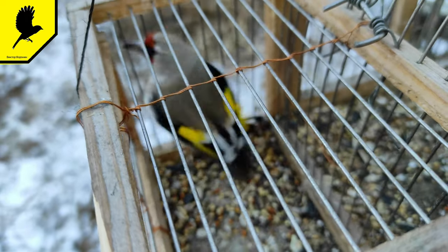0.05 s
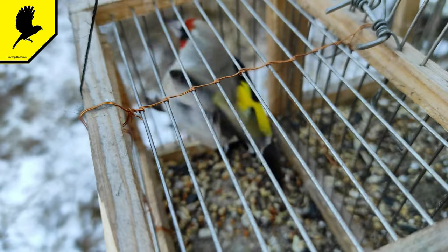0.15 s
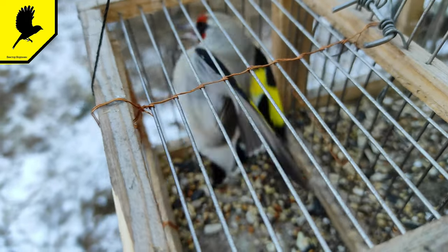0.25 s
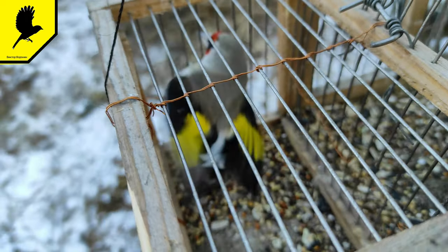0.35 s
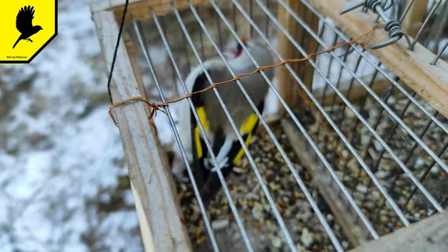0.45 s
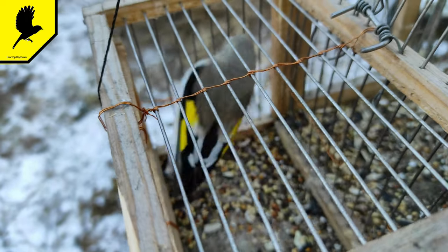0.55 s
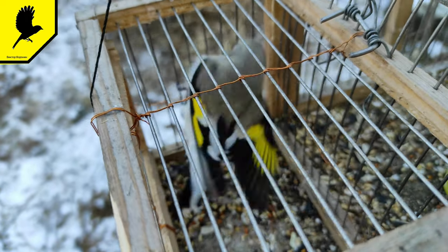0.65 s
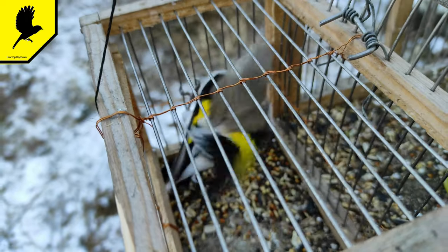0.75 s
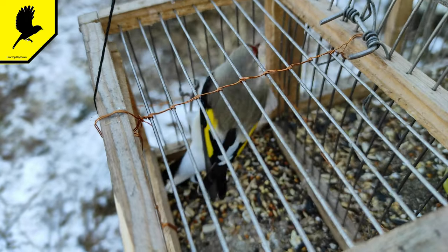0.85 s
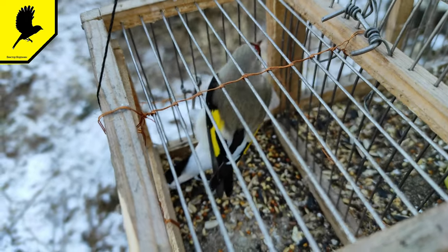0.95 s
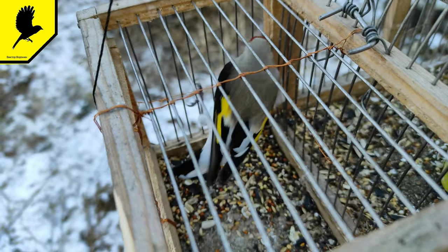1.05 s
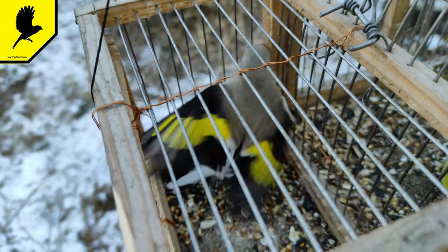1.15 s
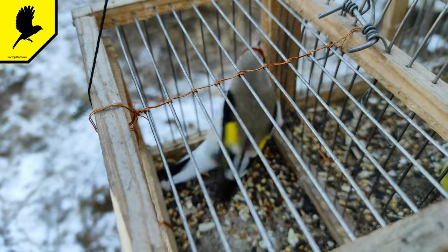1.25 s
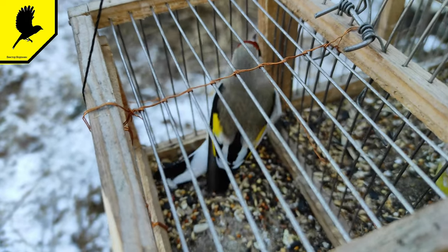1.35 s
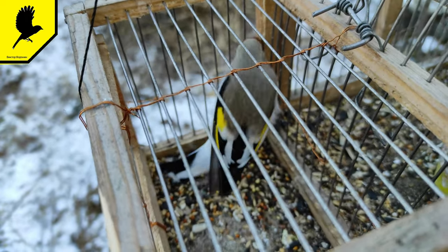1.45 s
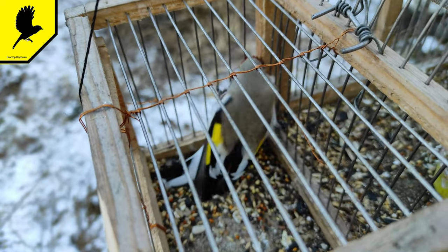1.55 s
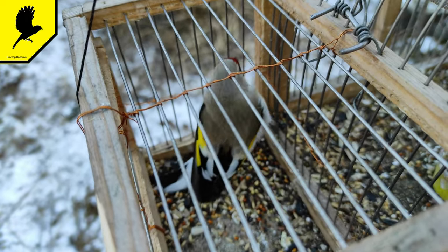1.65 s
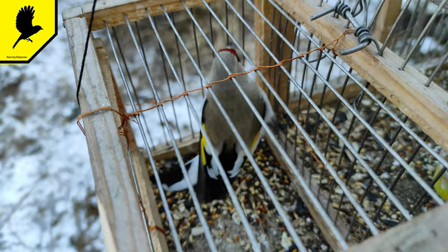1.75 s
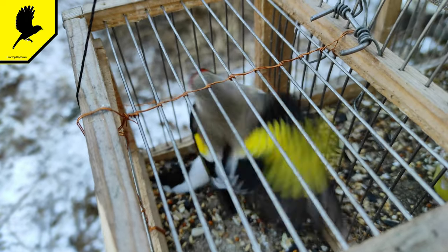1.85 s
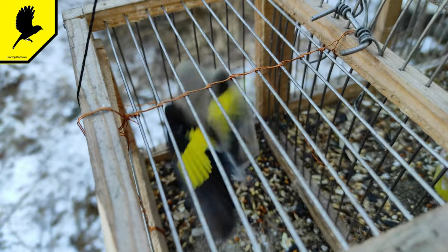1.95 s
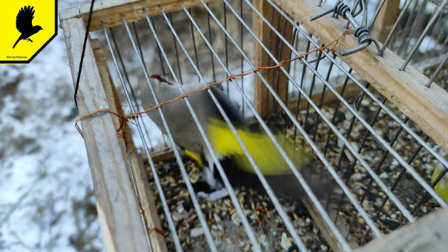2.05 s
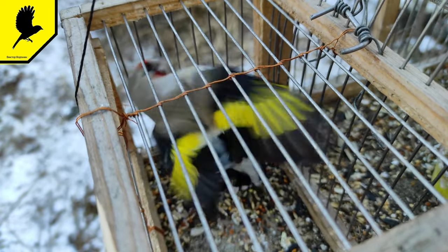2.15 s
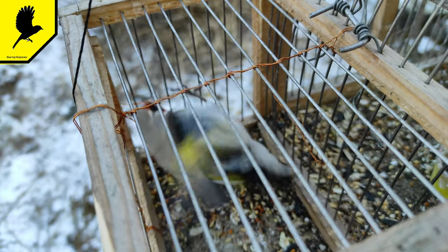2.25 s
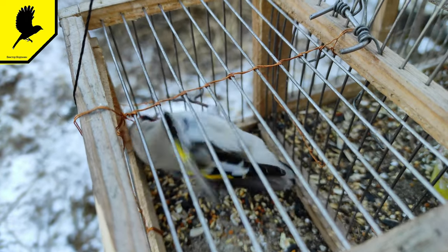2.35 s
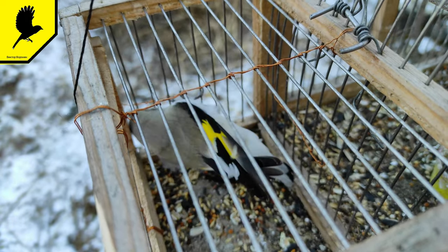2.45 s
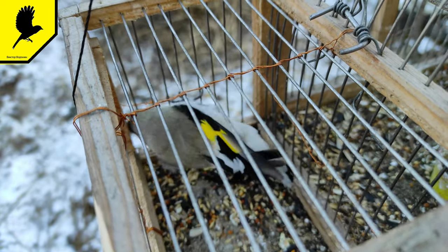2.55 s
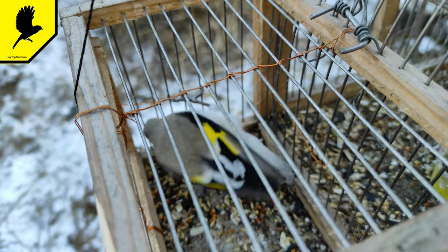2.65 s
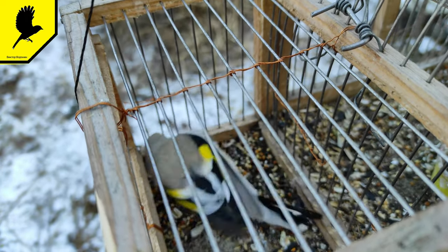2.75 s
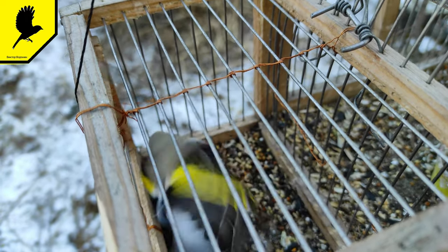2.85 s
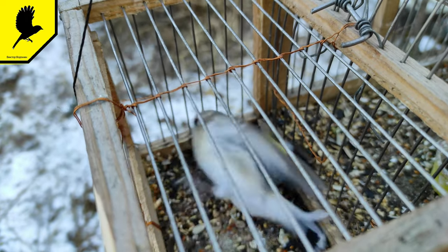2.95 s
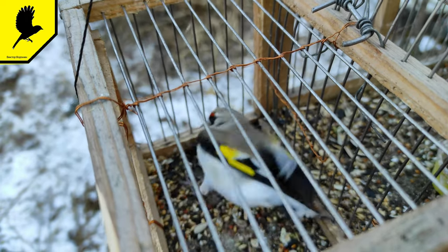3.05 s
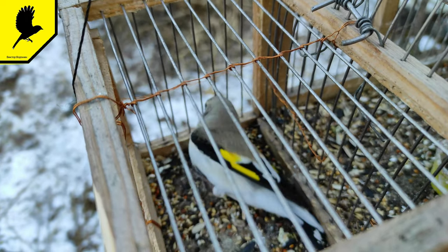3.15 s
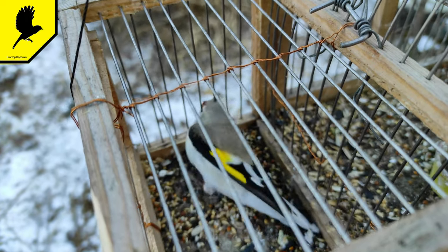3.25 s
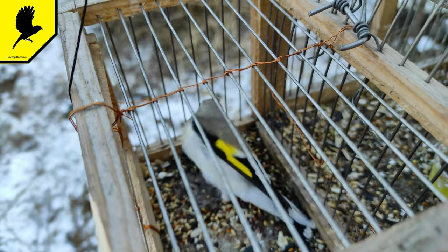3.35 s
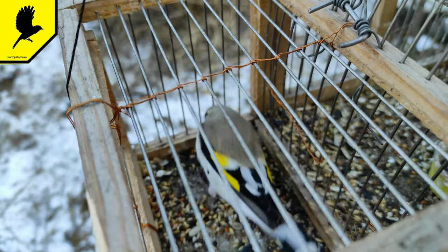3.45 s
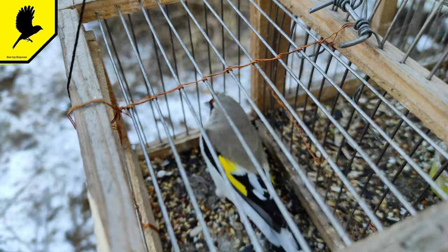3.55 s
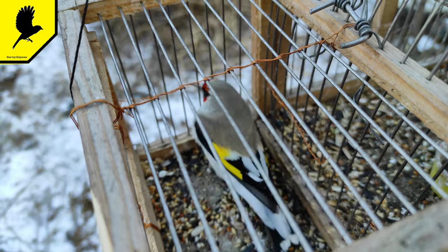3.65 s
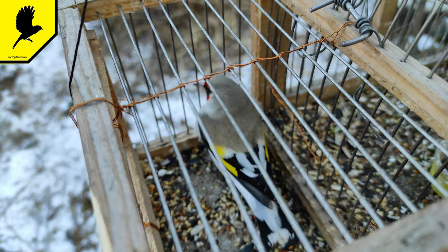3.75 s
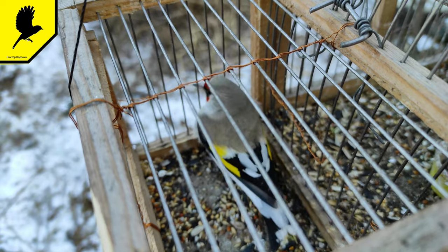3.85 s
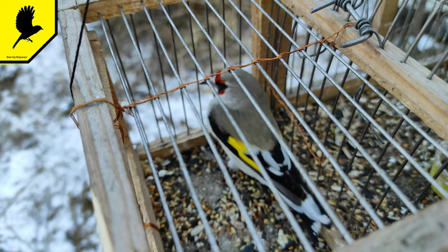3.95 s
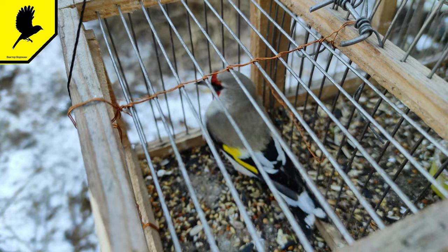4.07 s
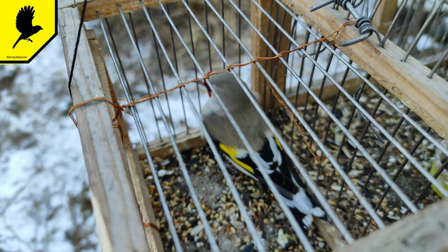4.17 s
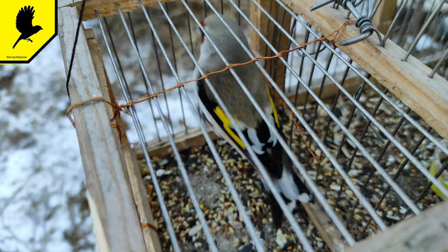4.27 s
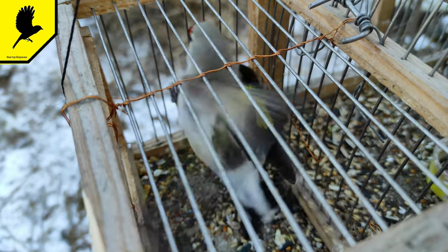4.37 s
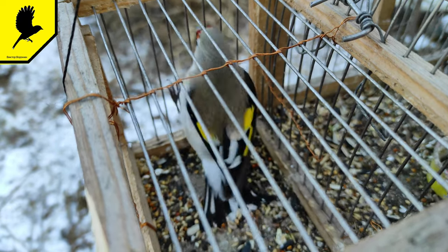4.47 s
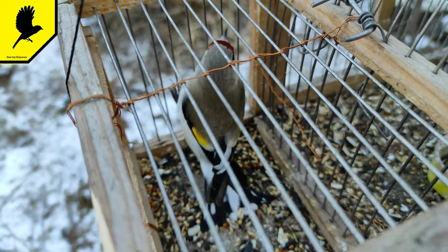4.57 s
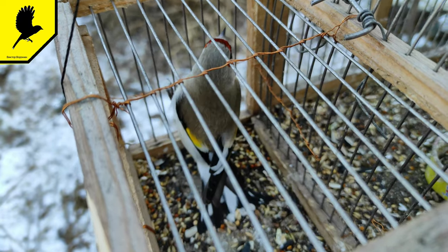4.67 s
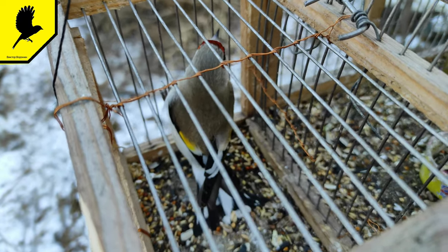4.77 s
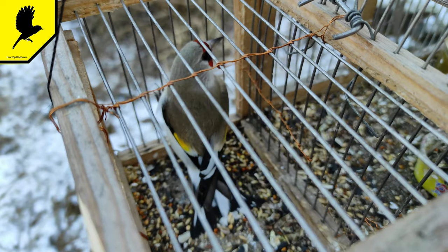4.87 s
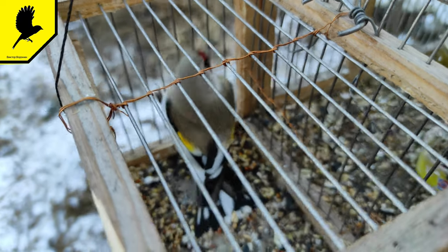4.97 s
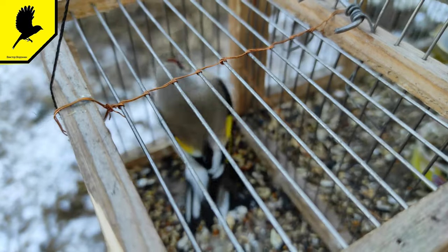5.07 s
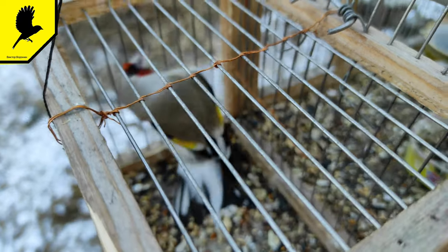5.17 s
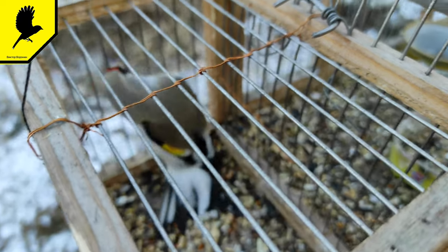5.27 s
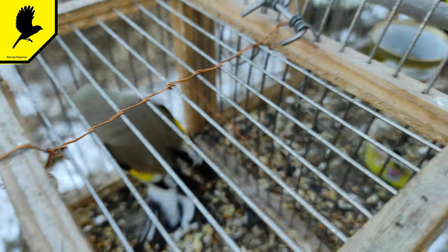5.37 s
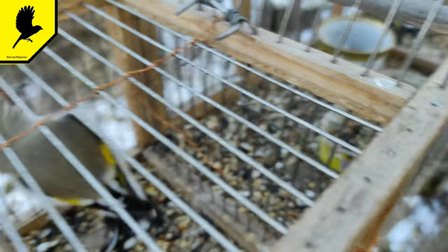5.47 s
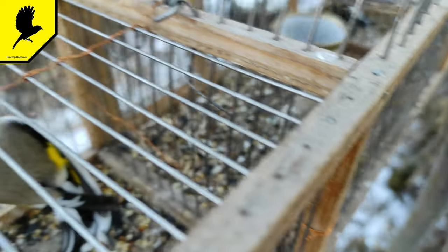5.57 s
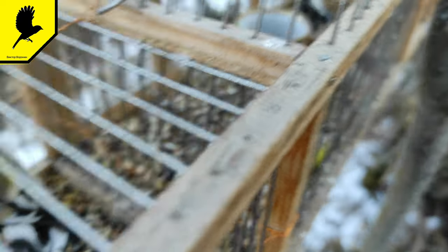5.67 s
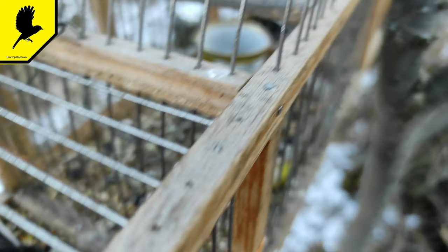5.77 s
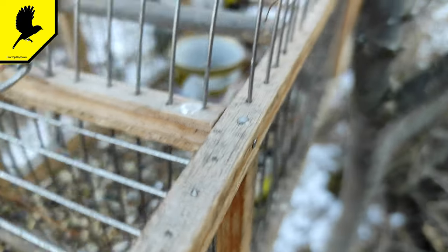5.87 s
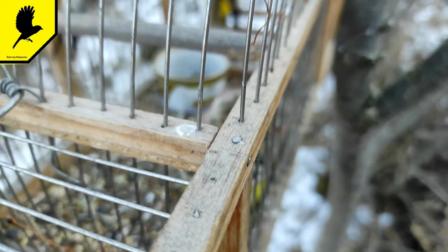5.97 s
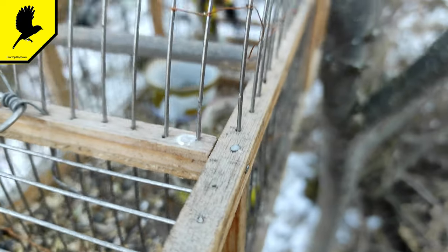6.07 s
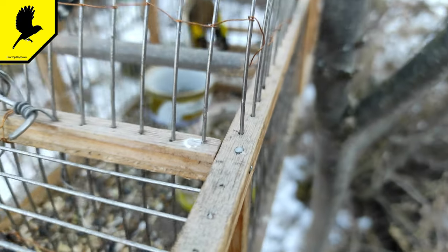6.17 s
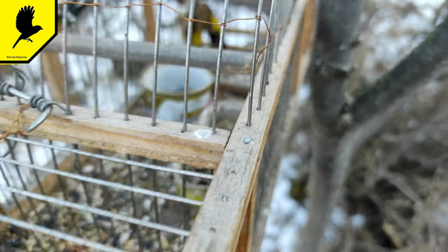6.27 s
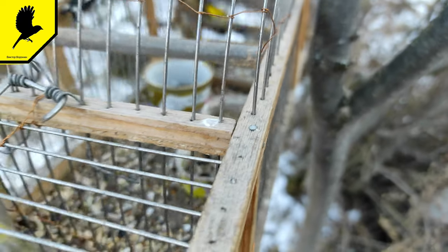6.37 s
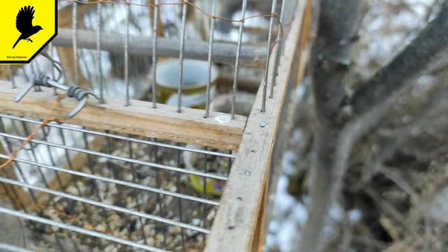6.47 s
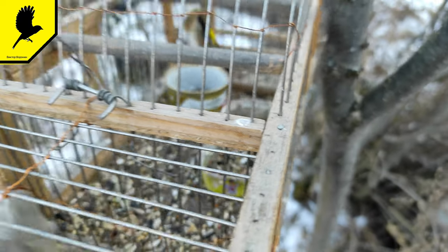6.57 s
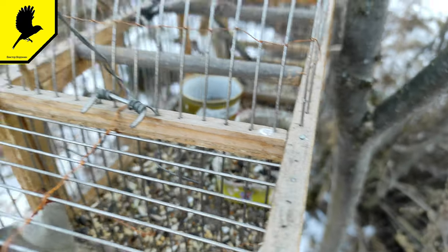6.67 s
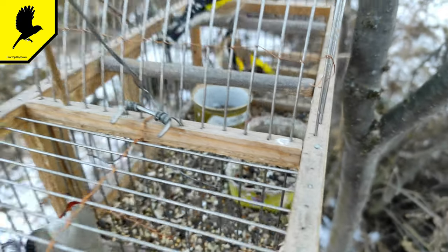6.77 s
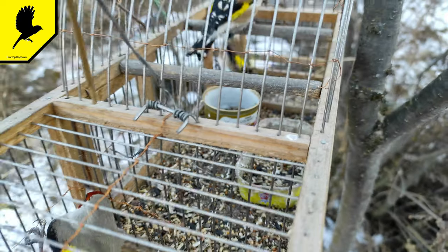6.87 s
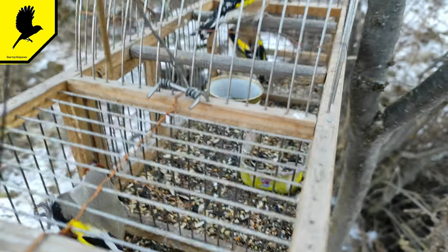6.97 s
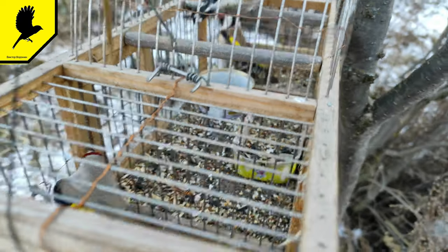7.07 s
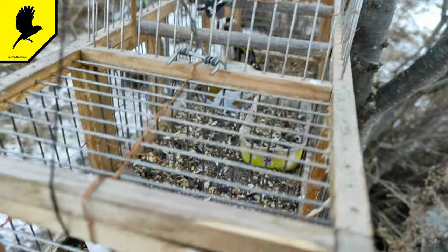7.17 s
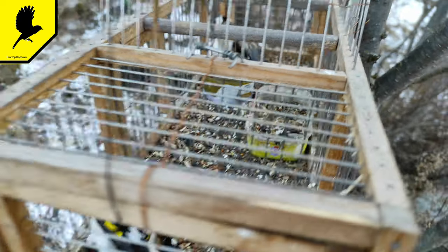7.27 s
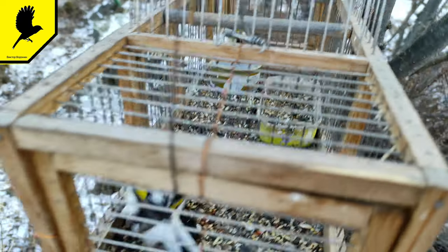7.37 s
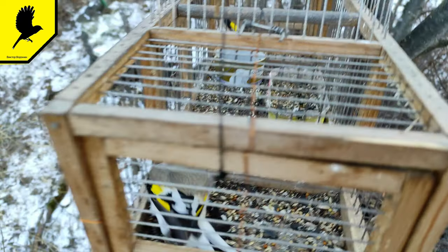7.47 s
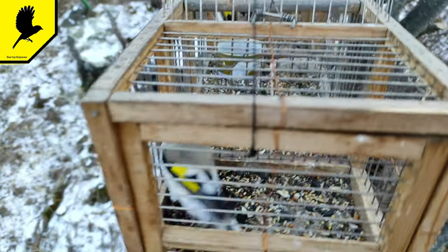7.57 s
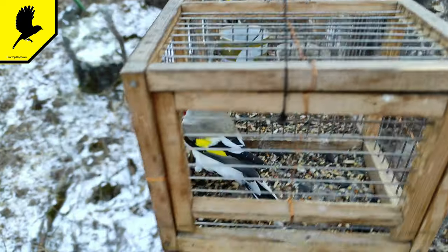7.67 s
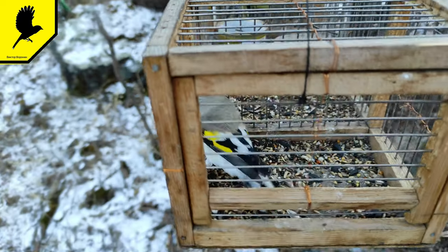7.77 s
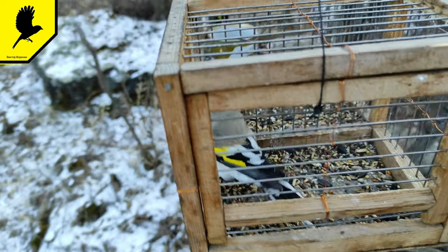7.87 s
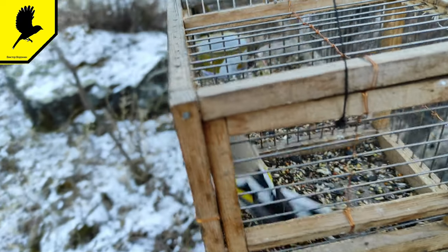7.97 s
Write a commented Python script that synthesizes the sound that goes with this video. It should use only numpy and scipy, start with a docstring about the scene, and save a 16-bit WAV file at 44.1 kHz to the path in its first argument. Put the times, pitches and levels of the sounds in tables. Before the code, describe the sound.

A small bird beats about in a wood-and-wire cage, close up: sharp dry ticks, feathery flutter bursts, scattered seed and woody knocks over faint outdoor hush.

```python
"""Small bird in a wire cage, close

Outdoors, a handheld two-port microphone close to a wood-framed wire cage; a small bird beats about inside.
Feathers and claws tick on bars and scatter seed: clusters of tiny clicks that also ring frame and wires.
Woody taps are decaying noise through resonances that thud and ring one bar.
Wing draughts and a light wind are low filtered noise on the ports; a faint shaped-noise hush lies below.
"""
import sys
import numpy as np
from scipy import signal
from scipy.fft import rfft, irfft
from scipy.io import wavfile

SR = 44100
rng = np.random.default_rng(int(sys.argv[2]) if len(sys.argv) > 2 else 0)


def transcribe(signal):
    """Save signal, clipped to [-1, 1], as a 16-bit WAV file at the path in sys.argv[1]."""
    frames = np.atleast_2d(signal).T
    limited = np.clip(frames, -1, 1)
    pcm = np.round(limited * 32767).astype(np.int16)
    wavfile.write(sys.argv[1], SR, pcm)


N = 353549

# Levels are set at the source: port shading and resonance act on all later, the path only on bird and cage.
# Spectrum of the distant outdoor hush: [f/Hz, relative density/dB]
HUSH_SPECTRUM = [(60, -11), (200, 14), (820, 8), (1500, -2), (4000, -13), (16000, -88)]
# Wind on the ports, before its lumps: [t/s, level/dB]
WIND_LEVEL = [(0.0, -50), (1.15, -61), (2.2, -47), (2.45, -58), (3.8, -60), (4.1, -70), (4.45, -47),
              (5.0, -62.5), (5.75, -58), (5.95, -69), (7.1, -72), (8.0, -66)]
# Wing draughts that thump on the ports: [t/s, swell peak level/dB]
DRAUGHTS = [(0.167, -46.5), (0.256, -43.5), (0.421, -41.5), (0.471, -40.5), (2.864, -45.5), (2.921, -41.5),
            (4.437, -45), (5.462, -45.5), (6.051, -46.5), (6.466, -48), (7.128, -50)]
# Taps that set one bar or slat ringing: [t/s, thud peak level/dB, pitch f/Hz]
BAR_KNOCKS = [(.421, -27, 1100), (1.388, -28.5, 2400), (1.411, -30.5, 970), (3.523, -37.5, 1270),
              (4.053, -44.5, 926), (5.474, -26, 1130), (5.521, -31.5, 1830), (5.581, -35.5, 2000),
              (5.584, -27.5, 980), (5.743, -39.5, 2020), (5.806, -38, 2370), (5.823, -39, 860),
              (5.861, -43, 2130), (6.12, -27.5, 2030), (6.471, -30.5, 1000), (6.527, -31, 910),
              (6.569, -37, 1010), (6.717, -36, 1020), (7.709, -44, 1480)]
# Faint stirring of feathers and seed between bouts: [t/s, tick level/dB]
STIRRING = [(0, -55.5), (.6, -58), (1.0, -66), (1.55, -56.5), (1.75, -68), (2.0, -53), (3.2, -61.5),
            (3.4, -65.5), (4.1, -75.5), (4.5, -70), (4.95, -72.5), (5.3, -60), (6.27, -62.5), (6.7, -54.5),
            (7.05, -60), (8.0, -59)]
# Bouts of fluttering and scrabbling: [start of hold t/s, hold/s, tick level/dB]
FLUTTER_BOUTS = [(.39, 0.03, -47.5), (0.686, 0.17, -52), (1.173, 0.21, -56), (2.3, 0.12, -47),
                 (2.573, 0.085, -49.5), (2.773, 0.26, -50), (3.125, 0.03, -46.5), (3.443, 0.18, -63.5),
                 (4.241, 0.074, -53.5), (4.37, 0.037, -50.5), (5.475, 0.18, -52.5), (6.033, 0.15, -57.5),
                 (6.38, 0.29, -55.5), (7.132, 0.015, -54), (7.283, 0.023, -54.5), (7.81, 0.044, -56.5)]
# Single blows of wing, claw and bill, strong and faint:
# [t/s, snap level/dB, cage drive relative to snap/dB, length/s]
SINGLE_BLOWS = [(0.019, -18, -5, 0.044), (0.1707, -17, -6, 0.027), (0.1846, -20, 4.5, 0.0076),
                (0.2244, -22.5, -6, 0.0061), (0.2543, -28.5, 8, 0.038), (0.306, -29.5, 4.5, 0.055),
                (0.3343, -24, -0.5, 0.015), (0.43, -21, -1, 0.019), (0.472, -16.5, 0.5, 0.028),
                (0.5914, -24.5, 0, 0.038), (0.821, -25, 6.5, 0.05), (1.022, -34, -0.5, 0.11),
                (1.229, -19.5, -4.5, 0.017), (1.2905, -28.5, -3.5, 0.083), (1.3354, -36.5, 11.5, 0.1),
                (1.372, -30, 9, 0.0082), (1.444, -18.5, 1.5, 0.04), (1.462, -23.5, 4.5, 0.029),
                (1.5715, -28.5, -18, 0.031), (1.7635, -32.5, -19, 0.016), (1.9412, -23, -1.5, 0.039),
                (2.002, -15.5, -3, 0.0046), (2.0437, -24, 5.5, 0.087), (2.0863, -23, 2.5, 0.03),
                (2.142, -25.5, -1, 0.075), (2.188, -24.5, 4.5, 0.067), (2.234, -26, 6, 0.064),
                (2.327, -18, -30, 0.078), (2.405, -18.5, -33, 0.08), (2.568, -19.5, -31, 0.03),
                (2.719, -23, -3, 0.02), (2.7683, -16.5, -3.5, 0.011), (2.8613, -29, 4, 0.28),
                (2.951, -25.5, 2, 0.14), (3.055, -27, 3.5, 0.071), (3.555, -33, 4.5, 0.064),
                (4.209, -35.5, -3.5, 0.03), (4.2616, -23, -29, 0.046), (4.3954, -22.5, -27, 0.018),
                (4.4447, -16, 0, 0.036), (5.038, -39, 1, 0.056), (5.1236, -26.5, -0.5, 0.045),
                (5.248, -22, -2.5, 0.028), (5.473, -13, -3.5, 0.0054), (6.052, -23, -37, 0.066),
                (6.188, -29, -4, 0.027), (6.566, -25, -5.5, 0.068), (6.952, -31, -1.5, 0.074),
                (7.622, -27.5, -6.5, 0.061)]
# Short claw and bill ticks on the wires: [t/s, snap level/dB]
WIRE_TICKS = [(0.253, -12.5), (0.261, -14.5), (.3916, -26), (0.5447, -20), (0.6342, -20.5), (.677, -24),
              (0.8342, -15.5), (1.15, -18.5), (1.405, -15.5), (1.419, -17), (1.93, -18), (1.9927, -12.5),
              (2.048, -21), (2.1278, -22), (2.195, -14.5), (2.233, -21.5), (2.29, -24), (2.341, -17.5),
              (2.37, -22), (2.419, -14.5), (2.619, -24), (2.6305, -14.5), (2.818, -25), (2.848, -17.5),
              (2.933, -19), (3.002, -22), (3.199, -28.5), (3.812, -28), (3.876, -40.5), (3.978, -31.5),
              (4.029, -35.5), (4.112, -39.5), (5.221, -21.5), (5.464, -14), (5.504, -19.5), (5.551, -23),
              (6.032, -23), (6.167, -24.5), (6.443, -25.5), (6.579, -32), (7.136, -26), (7.156, -24),
              (7.429, -26.5)]
# Modes of cage frame, floor and wires: [f/Hz, relative level/dB, 60 dB decay/s]
CAGE_MODES = [(236, -5, 0.011), (944.3, -14, 0.093), (1110, -12, 0.041), (1237, -13.5, 0.037),
              (1427, -6.5, 0.016), (1780, -0.5, 0.0094), (2035, 3, 0.0057), (2680, -1.5, 0.002),
              (3720, 11, 0.00059)]
# Resonances of the microphone ports: [f/Hz, width/Hz]
PORT_RESONANCES = [(6950, 1140), (8000, 2440)]
# Top treble as the microphone turns: [t/s, shelf gain/dB]
TREBLE_GAIN = [(0, 2.5), (1.3, -11.5), (2.2, -4), (6.4, -4), (7.2, 5.5), (7.7, -3)]

HUSH_DB = -65.5
KNOCK_CYCLES = 28          # cycles for a bar to ring down 60 dB
KNOCK_CONTACT_S, KNOCK_SNAP_DB = .002, 6   # contact time constant; snap above thud
BOUT_RISE_DB_PER_S, BOUT_FALL_DB_PER_S = 534, 183
TICK_RING_DB, TICK_S = -35, .008   # cage drive relative to snap; length of short ticks and knock snaps
CAGE_RING_DB = -22.5       # cage ring in the mix
PLACES, STAY_SAMPLES = 6, 220      # contact places in the cage; shortest stay at one
PATH_DB = -0.5             # cage to ports
LEFT_DB = 3                # left port over right
SHADE_HZ, SHADE_WIDTH_HZ, SHADE_SHARE = 5600, 7000, .5   # treble band lost at the left port
CUTOFF_HZ = 16500          # edge of the 60 dB stop band


def amp(db):
    """Decibels to gain."""
    return 10 ** (np.asarray(db) / 20)


def rms_one(x):
    """Scale to unit rms."""
    return x / np.sqrt(np.mean(x ** 2) + 1e-20)


def in_time(rows):
    """Columns of a curve table, one value per sample."""
    s, *columns = np.transpose(rows)
    return [np.interp(np.arange(N) / SR, s, c) for c in columns]


def drift(rate):
    """Slow random wander of unit rms, about rate changes a second."""
    r = np.exp(-2 * np.pi * rate / SR)
    noise = rng.standard_normal(N + SR)
    return rms_one(signal.lfilter([1], [1, -2 * r, r * r], noise)[SR:])


def poles(hz, width_hz):
    """Denominator of a two-pole resonance."""
    r = np.exp(-np.pi * width_hz / SR)
    return [1, -2 * r * np.cos(2 * np.pi * hz / SR), r * r]


def grains(per_s, spread_db):
    """Random clicks of very uneven size, unit rms."""
    sizes = amp(spread_db * np.minimum(rng.exponential(1, N), 5))
    signed = sizes * rng.choice([-1, 1], N)
    return rms_one(signed * (rng.random(N) < per_s / SR))


def hush():
    """Far outdoor noise, partly alike at both ports."""
    f, density_db = np.transpose(HUSH_SPECTRUM)
    hz = np.maximum(np.fft.rfftfreq(N, 1 / SR), 20)
    shape = amp(np.interp(np.log(hz), np.log(f), density_db))
    mid, side = irfft(rfft(rng.standard_normal((2, N))) * shape, N)
    pair = mid + .55 * side * np.array([[1], [-1]])
    return amp(HUSH_DB) * rms_one(pair)


def wind(wind_db):
    """Lumpy low turbulence, mostly its own on each port, swelling partly together on both."""
    rumble = signal.butter(2, [14, 75], "band", fs=SR, output="sos")
    gusts = signal.sosfilt(rumble, rng.standard_normal((2, N + SR)))[:, SR:]
    lumps = amp(3 * drift(6) + 2 * np.array([drift(12), drift(12)]))
    return amp(wind_db) * lumps * rms_one(gusts + 0.12 * gusts[::-1])


def draughts():
    """Each wing draught is a short dull swell of turbulence, largely alike at both ports."""
    starts = np.zeros(N)
    s, peak_db = np.transpose(DRAUGHTS)
    starts[np.round(s * SR).astype(int)] = amp(peak_db)
    t = np.arange(3000) / SR / 0.0071   # in units of the 7.1 ms rise
    swell = signal.oaconvolve(starts, t * np.exp(1 - t))[:N]
    dull = signal.butter(2, [45.0, 380.0], "band", fs=SR, output="sos")
    mid, side = signal.sosfilt(dull, rng.standard_normal((2, N)))
    return swell * rms_one(mid + 0.45 * side * np.array([[1], [-1]]))


def activity():
    """Tick level in dB: each bout rises fast, holds and dies away over the faint stirring."""
    (stir_db,) = in_time(STIRRING)
    t = np.arange(N) / SR
    power = amp(stir_db) ** 2
    for s, hold, level_db in FLUTTER_BOUTS:
        before_db = BOUT_RISE_DB_PER_S * (s - t)
        after_db = BOUT_FALL_DB_PER_S * (t - s - hold)
        away_db = np.maximum(before_db, after_db)
        power = power + amp(level_db - np.clip(away_db, 0, 100)) ** 2
    return 10 * np.log10(power)


def rustle():
    """Dense ticks of feathers, claws and seed, more clumped the harder the bird works."""
    tick_db = activity()
    effort = np.clip((tick_db + 71.5) / 25, .6, 1)
    clumps = amp(effort * (2.3 * drift(25) + 3 * drift(120)))
    return amp(tick_db) * clumps * grains(9000.0, 3.7)


def knocks():
    """A brief rough contact thuds broadly and rings one bar at its own pitch."""
    out = np.zeros(N)
    t = np.arange(SR // 10) / SR
    roughness = rng.standard_normal((len(BAR_KNOCKS), len(t)))
    for (s, peak_db, hz), rough in zip(BAR_KNOCKS, roughness):
        contact = rough * np.exp(-t / KNOCK_CONTACT_S)
        width_hz = np.log(1000) / np.pi * hz / KNOCK_CYCLES
        ring = signal.lfilter([1, -1], poles(hz, width_hz), contact)
        thud = signal.lfilter([1, -1], poles(hz, hz), contact)   # as wide as its pitch
        i = round(s * SR)
        out[i:i + len(t)] += amp(peak_db) * (.5 * ring / np.abs(ring).max() + thud / np.abs(thud).max())
    return out


def blows():
    """Each blow is a chatter of clicks that gathers fast, snaps and dies over its length."""
    ticks, drive = np.zeros(N), np.zeros(N)
    lead = 500   # samples of chatter before the snap
    t = np.arange(-lead, 2500) / SR
    rows = SINGLE_BLOWS + [(s, peak_db, TICK_RING_DB, TICK_S) for s, peak_db in WIRE_TICKS]
    rows += [(s, peak_db + KNOCK_SNAP_DB, TICK_RING_DB, TICK_S) for s, peak_db, _ in BAR_KNOCKS]
    chances = rng.random((len(rows), 3, len(t)))
    for (s, peak_db, ring_db, length), u in zip(rows, chances):
        length = max(length, .003)
        fall_db = np.where(t < 0, -130, 35) * t / length
        burst = (u[0] < .2) * (2 * u[1] - 1) * u[2] * amp(-fall_db)
        burst[lead] = np.sqrt(0.0046 / length)   # the shorter the blow, the more lies in its snap
        soft = u[1, 0] - .5   # contact a little harder or softer: brighter or duller
        i = round(s * SR) - lead
        ticks[i:i + len(t)] += amp(peak_db) * signal.lfilter([1, soft], [1], burst)
        drive[i:i + len(t)] += amp(peak_db + ring_db) * burst
    return ticks, drive


def cage(clicks):
    """Clicks ring every mode; each mode is caught more or less well as the contact moves."""
    out = 0
    for hz, level_db, t60 in CAGE_MODES:
        caught = amp(4 * drift(16))
        width_hz = np.log(1000) / np.pi / t60
        struck = amp(level_db) * caught * clicks + 1e-18   # tiny offset keeps the filter's numbers normal
        out = out + signal.lfilter([0, np.sin(2 * np.pi * hz / SR)], poles(hz, width_hz), struck)
    no_bass = signal.butter(2, 200.0, "high", fs=SR, output="sos")   # too small to radiate bass
    return signal.sosfilt(no_bass, out)


def to_ports(x):
    """Contacts lie at several places, each with its own lag at the left port and near reflections."""
    out = np.zeros((2, N))
    span = 250   # samples of reflections
    place = np.repeat(rng.integers(0, PLACES, N // STAY_SAMPLES + 1), STAY_SAMPLES)[:N]
    for k, lag in enumerate(np.linspace(2, 17, PLACES).astype(int)):   # lags in samples
        for side in range(2):
            paths = np.zeros(span)
            paths[rng.integers(20, span, 8)] = amp(-8) * rng.choice([-1, 1], 8)
            paths *= amp(-14.0 * np.arange(span) / span)   # later reflections are weaker
            paths[lag * (1 - side)] = 1   # direct sound
            out[side] += signal.oaconvolve(x * (place == k), paths)[:N]
    return amp(PATH_DB) * out


def shade(x):
    """The left port is louder, yet loses a broad band of treble to the hand."""
    a = poles(SHADE_HZ, SHADE_WIDTH_HZ)
    band = signal.lfilter(np.array([1, 0, -1]) * (1 - a[2]) / 2, a, x[0])
    shaded = np.array([x[0] - SHADE_SHARE * band, x[1]])
    return shaded * amp(np.array([[.5], [-.5]]) * LEFT_DB)


def port(x):
    """The air cavity before each capsule: flat lows, a strong peak, then a fall to a treble shelf."""
    cavity = x
    for hz, width_hz in PORT_RESONANCES:
        a = poles(hz, width_hz)
        cavity = signal.lfilter([sum(a)], a, cavity)
    cavity = signal.lfilter([.5, .5], [1, -np.exp(-2 * np.pi * 4550.0 / SR)], cavity)
    top = signal.butter(4, 10500.0, "high", fs=SR, output="sos")
    (treble_db,) = in_time(TREBLE_GAIN)
    return cavity + amp(treble_db) * signal.sosfilt(top, x)


def scene():
    """Bird and cage reach both ports; draughts, wind and hush join there."""
    (wind_db,) = in_time(WIND_LEVEL)
    background = hush() + wind(wind_db) + draughts()
    ticks = rustle()
    snaps, drive = blows()
    bare = to_ports(ticks + snaps + knocks())
    rung = cage(to_ports(ticks + drive))
    return background + bare + amp(CAGE_RING_DB) * rung


def record(dry):
    """Port shading and resonance, then the top is cut."""
    top_cut = signal.cheby2(12, 60, CUTOFF_HZ, fs=SR, output="sos")
    return signal.sosfilt(top_cut, port(shade(dry)))


dry = scene()
out = record(dry)
transcribe(out)
```